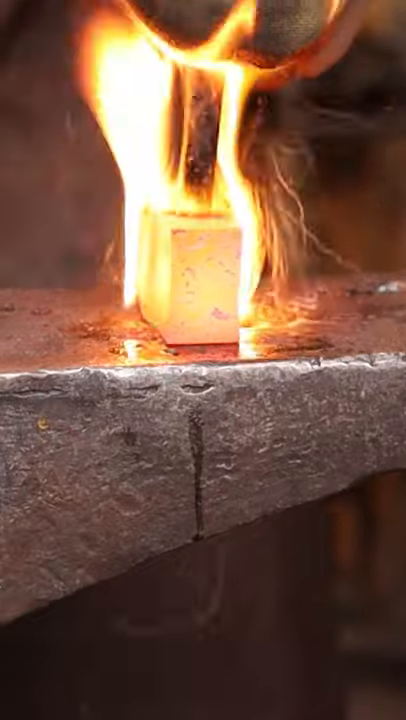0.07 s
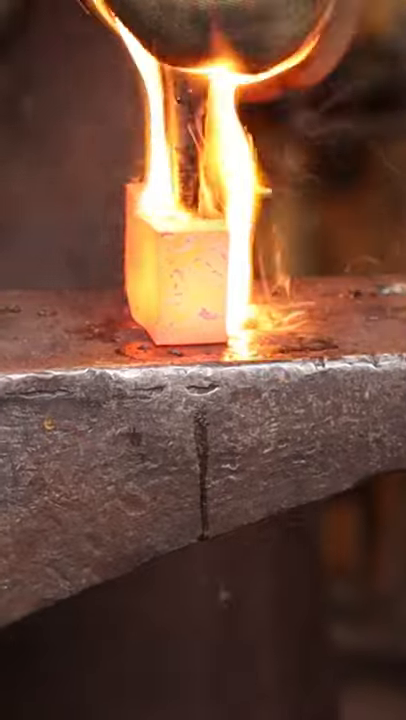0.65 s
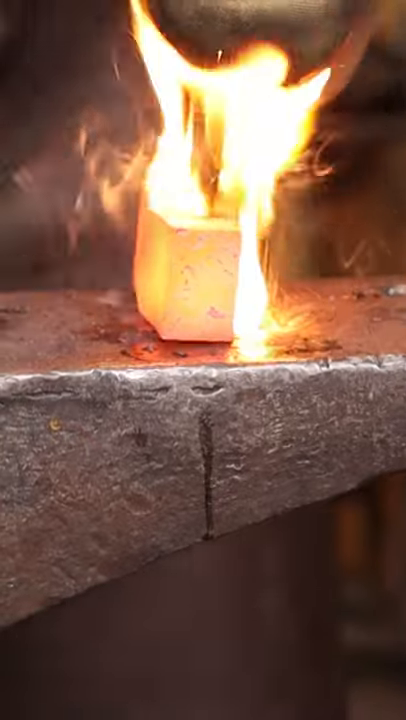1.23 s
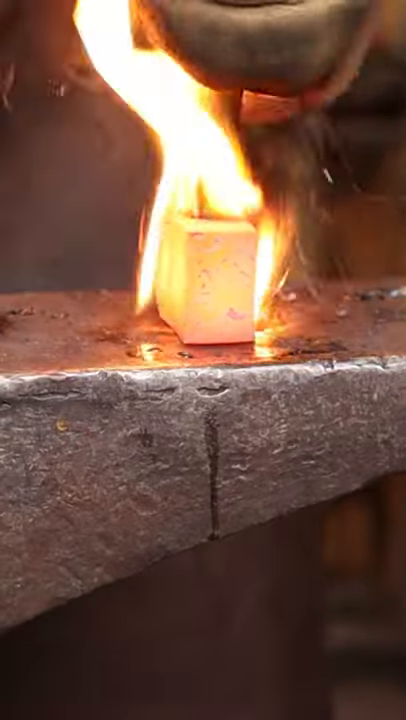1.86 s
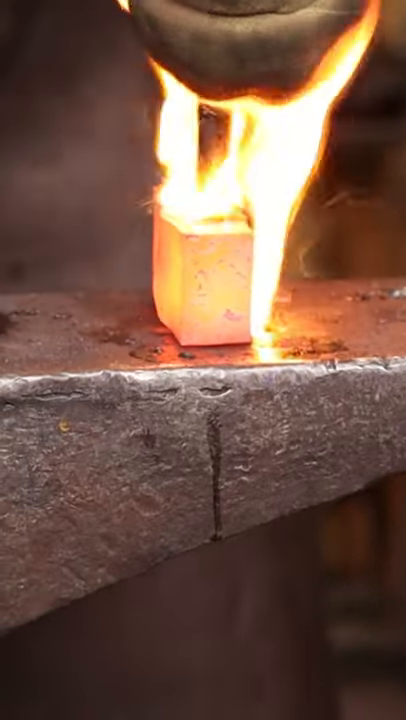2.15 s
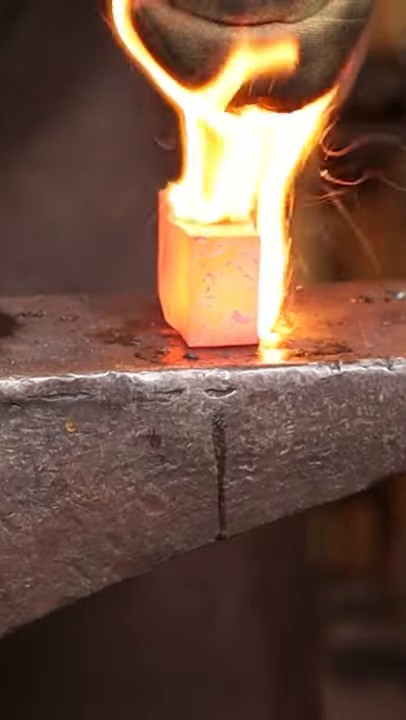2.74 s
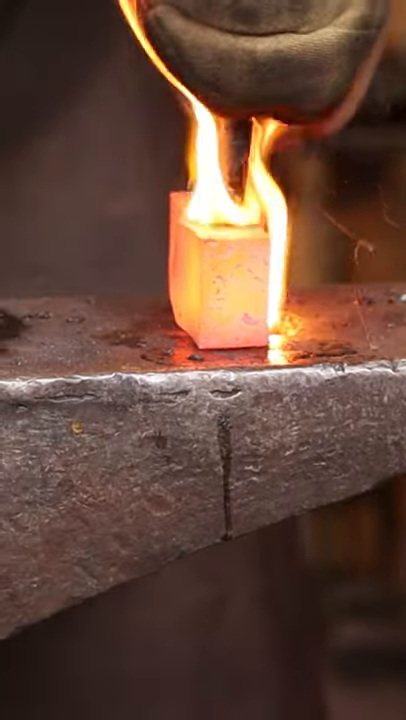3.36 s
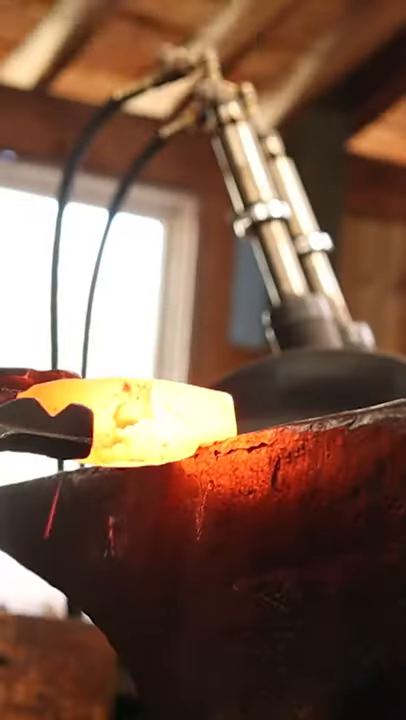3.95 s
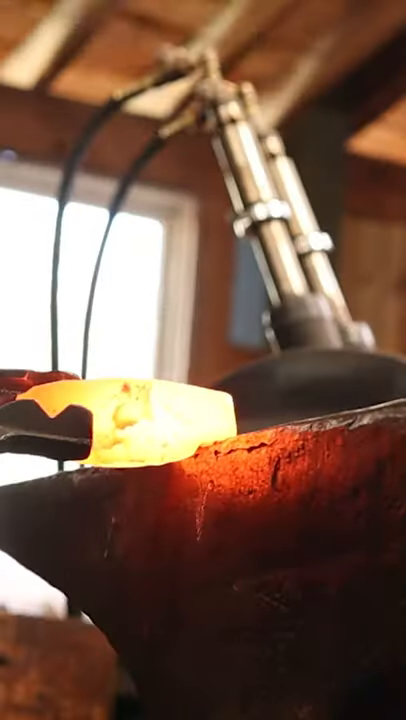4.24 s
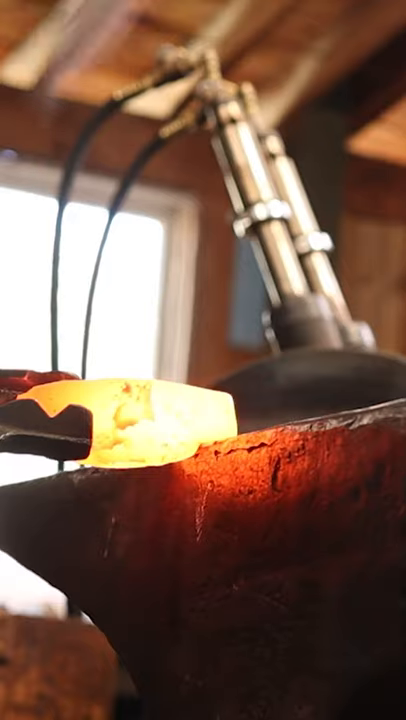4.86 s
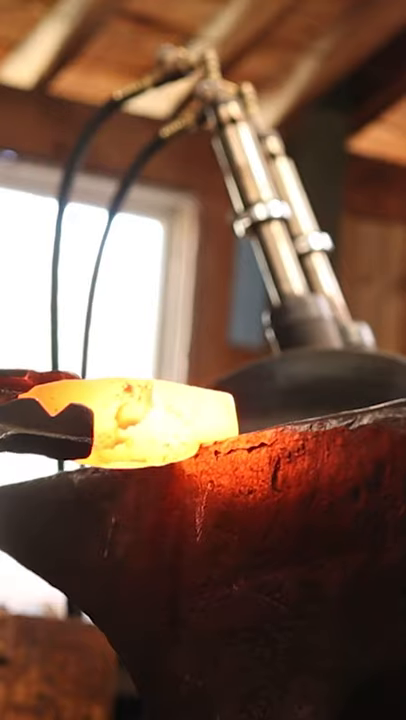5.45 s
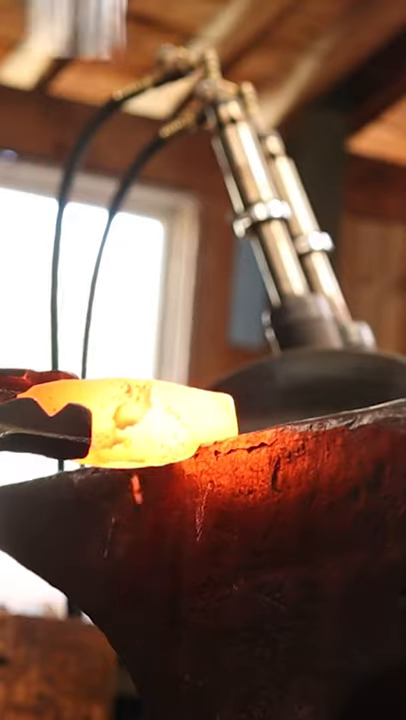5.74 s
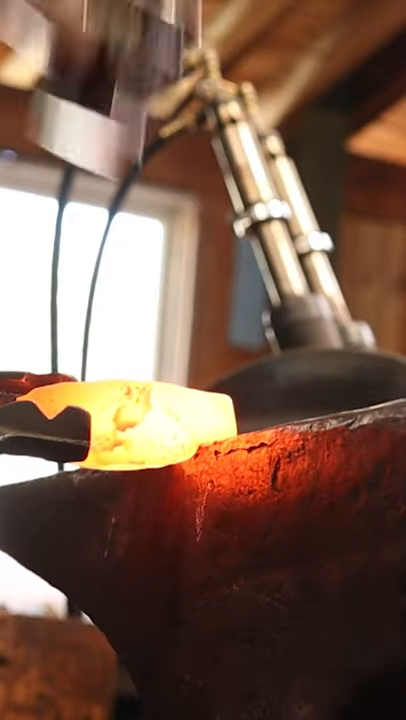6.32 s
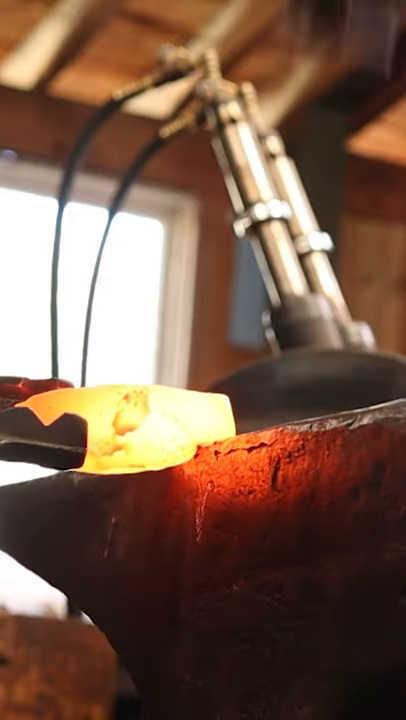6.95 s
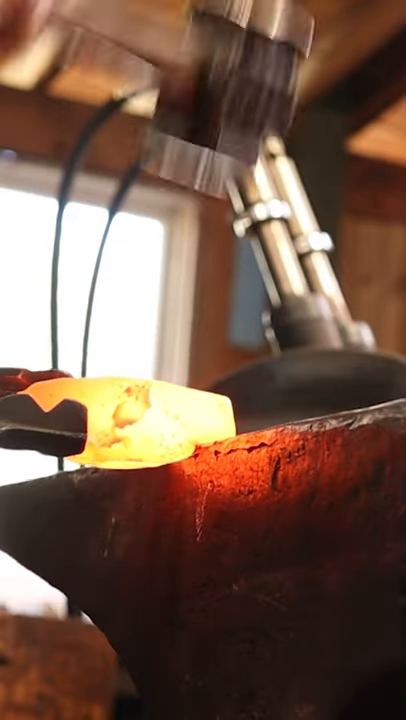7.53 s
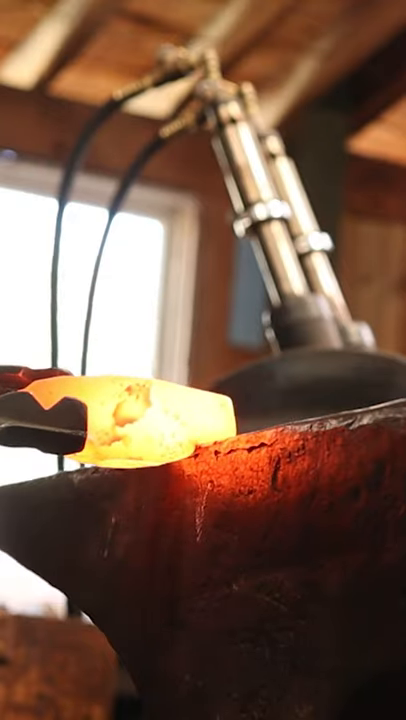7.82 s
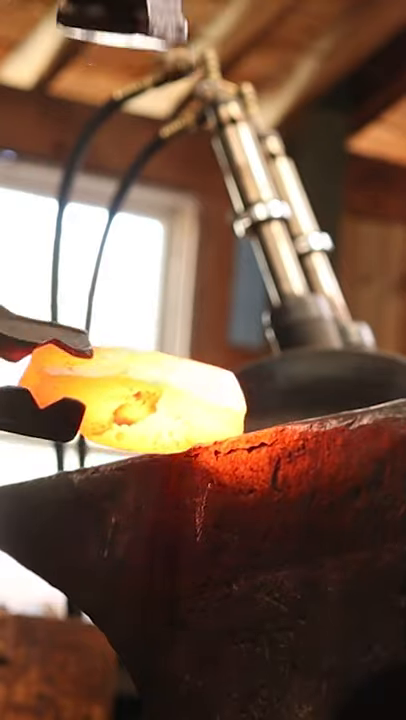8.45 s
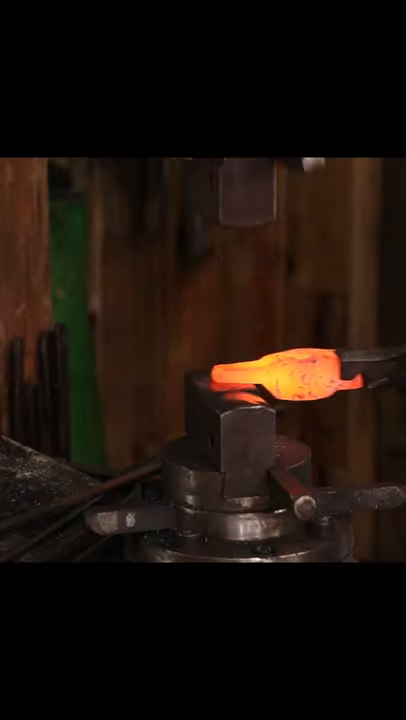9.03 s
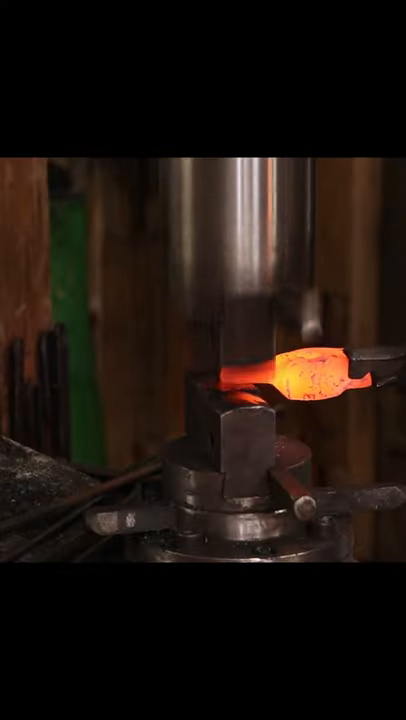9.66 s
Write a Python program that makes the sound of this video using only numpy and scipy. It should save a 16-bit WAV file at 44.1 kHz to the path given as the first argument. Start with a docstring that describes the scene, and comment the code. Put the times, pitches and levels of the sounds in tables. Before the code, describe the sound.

Hard hammer blows clank on a steel punch, then on hot steel on an anvil, before a power hammer pounds four quick strokes.

```python
"""Hammer blows on hot steel: three forge jobs in turn, close to a microphone that overloads on hard hits.
A hammer drives a punch into a block while the lubricant burns and spits, then draws out a billet on a
ringing anvil. Last, a power hammer pounds a bar and puffs air. Each blow is a contact crack plus decaying
modes, echoed by the workshop. Tongs tick and the billet scuffs between blows, over faint air and hum."""
import sys
import numpy as np
from scipy import signal
from scipy.fft import rfft, irfft
from scipy.io import wavfile

SR = 44100
rng = np.random.default_rng(int(sys.argv[2]) if len(sys.argv) > 2 else 0)


def unload_audio(sound):
    """Save the sound as a 16-bit wav file, at the path given as the first command line argument."""
    columns = np.transpose(np.atleast_2d(sound))
    # keep every value between -1 and 1, then stretch to whole-number steps
    steps = np.round(np.clip(columns, -1, 1) * 32767)
    wavfile.write(sys.argv[1], SR, steps.astype(np.int16))


N = 427329
TIME = np.arange(N) / SR
AGE = np.arange(SR) / SR  # s since an onset
RAM_START_S = 8.768

# hammer on billet, equal swings: start_s, clang_db, hammer_ping_db, anvil_note_db
BILLET_BLOWS = [(3.862, 2, -35, -71.5), (4.478, 0.5, -24, -62), (5.085, 0.5, -24.5, -90.5),
                (5.7032, -13, -53.5, -75.5), (6.325, -2, -32.5, -73.5), (6.944, -0.5, -30.5, -93),
                (7.5571, -1.5, -28.5, -80), (8.1848, -12.5, -35, -78.5)]
# wall echo spectrum for punch and tongs: freq_hz, gain_db
PUNCH_ROOM = [(50, -7), (200, 21), (500, 4.5), (1000, 7.5), (1250, 2.5), (1600, 0.5), (4000, 1),
              (6000, -1.5), (10000, -9.5), (16000, -15)]


def amp(db):
    """Decibels to gain."""
    return 10 ** (np.asarray(db) / 20)


def unit_rms(x):
    """Scale to rms 1."""
    return x / np.sqrt(np.mean(x ** 2) + 1e-20)


def unit_energy(x):
    """Scale to energy 1."""
    return x / (np.linalg.norm(x) + 1e-20)


def curve_at(points, hz):
    """Interpolate on a log-frequency axis."""
    freq_hz, value = np.transpose(points)
    return np.interp(np.log(hz + 1), np.log(freq_hz + 1), value)


def add(mix, start_s, sound):
    """Mix a sound in place."""
    part = mix[max(round(start_s * SR), 0):][:len(sound)]
    part += sound[:len(part)]


def tinted(x, colour):
    """Filter by a (freq_hz, gain_db) curve."""
    return irfft(rfft(x) * amp(curve_at(colour, np.fft.rfftfreq(len(x), 1 / SR))), len(x))


def hiss(colour):
    """Steady coloured noise."""
    return unit_rms(tinted(rng.standard_normal(N), colour))


def background(air_db=-71):
    """Quiet shop air and faint electric hum."""
    # air spectrum: freq_hz, gain_db
    shop_air = [(20, -30.5), (50, -6.5), (100, -4.5), (200, -10.5), (500, -15), (1200, -16.5), (2500, -21),
                (5000, -22.5), (8000, -28.5), (16000, -29)]
    # hum: pitch_hz, level_db
    hum_tones = [(104, -79.5), (176, -80.5), (268, -84.5)]
    hum = sum(amp(db) * np.sin(2 * np.pi * (hz * TIME + rng.random())) for hz, db in hum_tones)
    return amp(air_db) * hiss(shop_air) + hum


def taps():
    """Sparse reflections of random sign and size."""
    return rng.standard_normal(SR) * (rng.random(SR) < .25)


def workshop(colour, count, bench_db, bench_s, room_db, wall_s, early_share):
    """One response per blow: bench and tools, then walls. Only the smith moves, so all are alike."""
    # wall decay: freq_hz, t60_s
    room_t60 = [(60, 1), (200, 0.37), (900, 0.37), (1250, 0.37), (1700, 0.35), (3000, 0.32), (6000, 0.23),
                (10000, 0.17), (16000, 0.73)]
    still_bench, still_walls, responses = taps(), taps(), []
    swell = np.interp(AGE, [wall_s * 2 / 3, wall_s * 7 / 8], [early_share, 1])
    for _ in range(count):
        bench = unit_energy((still_bench + taps() / 2) * np.exp(-AGE / bench_s) * (AGE > .003))
        hz, t, bands = signal.stft(still_walls + taps(), SR, nperseg=256)
        decay = amp(-60 * np.maximum(t - wall_s, 0) / curve_at(room_t60, hz)[:, None])
        tail = signal.istft(bands * decay, SR, nperseg=256)[1][:SR]
        walls = tinted(unit_energy(tail * swell), colour)
        responses.append(amp(bench_db) * bench + amp(room_db) * walls)
    return responses


def crackle(colour, rate_hz, size_db, burst_gain, decay_s=0.00067):
    """Tiny uneven bursts over a soft fizz."""
    sizes = amp(size_db * np.minimum(rng.exponential(1, N), 3))
    onsets = rng.random(N) < rate_hz / SR
    envelope = signal.lfilter([1], [1, -np.exp(-1 / (decay_s * SR))], sizes * onsets)
    bursts = unit_rms(tinted(envelope * rng.standard_normal(N), colour))
    return unit_rms(burst_gain * bursts + .5 * hiss(colour))


def flames(burn_db=-64.5, hold_s=2.1, fade_db_per_s=7.5, flare_rise_s=0.0034, flare_decay_s=0.056):
    """Lubricant fizzes and spits around the punch, then runs out."""
    # fresh lubricant flares on hot steel: start_s, level_db
    flares = [(1.52, -49), (1.635, -56), (2.1, -64)]
    # burn spectrum: freq_hz, gain_db
    sizzle = [(200, -17.5), (1200, -4), (2800, -9.5), (4400, -2), (6500, -9), (9000, -9), (16000, -12.5)]
    burning = amp(burn_db - fade_db_per_s * np.maximum(TIME - hold_s, 0))
    for start_s, db in flares:
        add(burning, start_s, amp(db) * (1 - np.exp(-AGE / flare_rise_s)) * np.exp(-AGE / flare_decay_s))
    first_job = TIME < BILLET_BLOWS[0][0]
    return burning * first_job * crackle(sizzle, rate_hz=450, size_db=3.5, burst_gain=.55)


def click(colour, size=4096):
    """Minimum-phase contact pulse with the given spectrum."""
    log_gain = np.log(amp(curve_at(colour, abs(np.fft.fftfreq(size, 1 / SR)))))
    pulse = np.fft.ifft(np.exp(np.conj(signal.hilbert(log_gain)))).real[:size // 2]
    return unit_energy(np.pad(pulse, (0, SR - len(pulse))))


def ring(modes, spread=0.0087):
    """Decaying modes of alternating sign, slightly detuned at random; strength varies per blow."""
    strengths = amp(rng.uniform(-2, 2, len(modes)))
    out = np.zeros(SR)
    for k, (hz, db, t60_s) in enumerate(modes):
        pitch_hz = hz * (1 + spread * rng.standard_normal())
        mode = unit_energy(amp(-60 * AGE / t60_s) * np.sin(2 * np.pi * pitch_hz * AGE))
        out += (-1) ** k * strengths[k] * amp(db) * mode
    return out


def ping(hz, db, t60_s, waver, width_hz, rise_s):
    """Long pure ring beating with its own echoes."""
    t = np.arange(3 * SR) / SR
    band = np.exp(-(np.fft.fftfreq(len(t), 1 / SR) / width_hz) ** 2)
    echoes = np.fft.ifft(band * np.exp(2j * np.pi * rng.random(len(t))))
    tone = (1 + waver * echoes / np.std(echoes)) * np.exp(2j * np.pi * hz * t)
    envelope = amp(db - 60 * t / t60_s) * (1 - np.exp(-t / rise_s))
    return envelope * tone.imag / np.sqrt(1 + waver ** 2)


def scatter(direct_db, decay_s):
    """First contact, then brief chatter and close reflections."""
    chatter = unit_energy(taps() * np.exp(-AGE / decay_s))
    chatter[0] = amp(direct_db)
    return unit_energy(chatter)


def strike(colour, ringing, near, room):
    """A crack and the modes it wakes, direct and through the room."""
    crack = click(colour)
    direct = signal.fftconvolve(crack, near)[:SR] + ringing
    echoes = signal.fftconvolve(crack + ringing, room)[:SR]
    return (direct + echoes)[:int(.85 * SR)]


def tongs(faint_rate_hz=2.5, faint_db=-45, faint_spread_db=2.5):
    """Steel-on-steel ticks of tongs and punch, with faint ones at random."""
    # clear ticks: start_s, level_db
    clear_ticks = [(1.6777, -25.5), (1.7425, -29.5), (2.0567, -27.5), (2.1146, -25), (3.0153, -25),
                   (3.102, -33.5), (4.4269, -39.5), (4.8892, -31.5), (5.047, -36), (6.9096, -36),
                   (8.0877, -34), (8.666, -38)]
    # contact spectrum: freq_hz, gain_db
    tick_colour = [(100, -34), (1000, -5.5), (2500, -10), (4500, 2.5), (8000, -7), (16000, -14)]
    # tong modes: pitch_hz, gain_db, t60_s
    tong_modes = [(3330, -15, .04), (4150, -12, .05), (5000, -14, .04), (6440, -6.5, .05)]
    draws = rng.random((round(faint_rate_hz * RAM_START_S), 2))
    faint_ticks = [(when * RAM_START_S, faint_db + faint_spread_db * (2 * size - 1))
                   for when, size in draws]
    ticks = clear_ticks + faint_ticks
    rooms = workshop(PUNCH_ROOM, len(ticks), bench_db=-4.5, bench_s=0.014,
                     room_db=-11, wall_s=0.047, early_share=.8)
    out = np.zeros(N)
    for (start_s, db), room in zip(ticks, rooms):
        ringing = ring(tong_modes, spread=0.061)
        near = scatter(direct_db=-5.5, decay_s=0.0027)
        add(out, start_s, amp(db) * strike(tick_colour, ringing, near, room))
    return out


def scuffing(half_width_s=0.1):
    """The billet slides on its scale across the anvil face."""
    # slides: centre_s, level_db
    slides = [(5.414, -65.5), (7.254, -64.5), (8.0, -69.5)]
    # scuff spectrum: freq_hz, gain_db
    scuff_colour = [(300, -5), (1300, 3.5), (2500, -4), (4300, -3), (6000, -4), (9000, -17.5), (16000, -14)]
    sliding = sum(amp(db) * np.exp(-((TIME - centre_s) / half_width_s) ** 2) for centre_s, db in slides)
    return sliding * crackle(scuff_colour, rate_hz=560, size_db=4, burst_gain=.5)


def squeak(hz, width_hz):
    """Noise in one narrow resonance."""
    band = np.exp(-((np.fft.rfftfreq(N, 1 / SR) - hz) / width_hz) ** 2)
    return unit_rms(irfft(rfft(rng.standard_normal(N)) * band, N))


def power_hammer(air_db=-48, air_lead_s=0.035, air_s=0.048, motor_db=-43, knock_db=-15, knock_lag_s=.14):
    """The drive rumbles, air rushes as the ram falls, the frame thumps, the linkage knocks going up."""
    # strokes: start_s, force_db, thump_db
    blows = [(8.770, -2.5, -19), (8.9966, 4, 7.5), (9.2651, 1.5, 10), (9.5338, 3.5, 10)]
    # spectra of contact, drive and linkage, air: freq_hz, gain_db
    crack_colour = [(40, -28.5), (100, -13), (300, -1), (500, 0.5), (900, -5), (1500, -6.5), (2200, -6),
                    (3100, -3.5), (4200, -9), (6200, -17), (8000, -24.5), (16000, -41.5)]
    machine_colour = [(30, -37), (70, -36), (130, -6), (290, -1.5), (420, -5), (600, -14.5), (1200, -15.5),
                      (2500, -21), (5000, -37), (16000, -54)]
    air_colour = [(500, -32), (2500, -11), (4700, -11), (6800, -16), (9000, -20), (16000, -27)]
    # die and frame modes: pitch_hz, gain_db, t60_s
    die_modes = [(3130, -13, 0.041), (3230, -25, 0.049), (6060, -21, 0.031)]
    frame_modes = [(227.6, 0, 0.068), (148, -10.5, 0.031), (275.4, -12.5, 0.51), (354, -18, 0.75),
                   (440, -17, 0.38)]
    # air valve squeaks: pitch_hz, width_hz, level_db
    valve = [(2450, 380, -50), (7900, 500, -57)]
    room_colour = [(100, 15.5), (4000, 3), (16000, -24)]  # freq_hz, gain_db
    rooms = workshop(room_colour, len(blows), bench_db=-7, bench_s=0.055,
                     room_db=-7, wall_s=0.031, early_share=0.5)
    thump_rise = 1 - np.exp(-AGE / 0.013)
    out = np.zeros(N)
    for (start_s, force_db, thump_db), room in zip(blows, rooms):
        near = scatter(direct_db=-16.5, decay_s=0.026)
        add(out, start_s, amp(force_db) * strike(crack_colour, ring(die_modes, spread=0.026), near, room))
        add(out, start_s, amp(thump_db) * ring(frame_modes, spread=0.014) * thump_rise)
        add(out, start_s + knock_lag_s, amp(knock_db) * strike(machine_colour, 0, near, room))
    puffs = sum(np.exp(-((TIME - start_s + air_lead_s) / air_s) ** 2) for start_s, _, _ in blows[1:])
    air = amp(air_db) * hiss(air_colour)
    air += sum(amp(db) * squeak(hz, width_hz) for hz, width_hz, db in valve)
    running = amp(motor_db) * hiss(machine_colour) + puffs * air
    return out + running * (TIME > RAM_START_S)


def hammer_on_billet(force_db=16.5, overtone_db=-8):
    """Soft hot steel thuds; hammer and anvil ring, and a square blow wakes the anvil's long note."""
    # spectra of contact and wall echo: freq_hz, gain_db
    crack_colour = [(30, -21), (100, -10.5), (200, -13.5), (300, -7.5), (460, -6.5), (620, -11.5),
                    (1000, -3), (1300, 0), (2100, 1.5), (3000, 1.5), (4000, -0.5), (7000, -8), (10000, -13),
                    (16000, -27)]
    room_colour = [(50, 2.5), (200, 9.5), (500, 5.5), (1000, 3), (1250, 3), (1800, -3.5), (4000, -3),
                   (6000, -5.5), (10000, -14.5), (16000, -15.5)]
    # modes of the clang and the hot billet: pitch_hz, gain_db, t60_s
    clang_modes = [(2523, -13.5, 0.099), (2556, -12.5, .06), (2730, -13.5, 0.025), (3330, -14.5, .025),
                   (3925, -17.5, .05), (1159, -24, 0.084)]
    thud_modes = [(500, -25.5, 0.05), (1380, -0.5, 0.0021), (1710, 1.5, 0.0016)]
    # long rings of hammer, anvil note, anvil overtone: pitch_hz, t60_s
    pings = [(12520, .54), (3226, 3.6), (5835, 2.2)]
    # ring of the anvil's waist: pitch_hz, gain_db, t60_s
    waist = (2620, -23.5, .36)
    (hammer_hz, hammer_t60_s), *anvil = pings
    waist_hz, waist_db, waist_t60_s = waist
    rooms = workshop(room_colour, len(BILLET_BLOWS), bench_db=-11, bench_s=0.024,
                     room_db=-9.5, wall_s=0.085, early_share=0.74)
    out = np.zeros(N)
    for (start_s, clang_db, hammer_db, anvil_db), room in zip(BILLET_BLOWS, rooms):
        clang = amp(clang_db) * ring(clang_modes)
        near = scatter(direct_db=5.5, decay_s=0.0025)
        add(out, start_s, amp(force_db) * strike(crack_colour, clang, near, room))
        add(out, start_s, amp(force_db) * ring(thud_modes))
        add(out, start_s, ping(waist_hz, waist_db + clang_db, waist_t60_s,
                               waver=2.5, width_hz=65, rise_s=.02))
        add(out, start_s, ping(hammer_hz, hammer_db, hammer_t60_s, waver=2.3, width_hz=80, rise_s=0.17))
        for k, (hz, t60_s) in enumerate(anvil):
            note_db = anvil_db + k * overtone_db
            add(out, start_s, ping(hz, note_db, t60_s, waver=.15, width_hz=3.4, rise_s=.003))
    return out


def hammer_on_punch(clink_db=-1.5, clink_db_per_s=1.04, body_db=2.5, body_db_per_s=-2):
    """As the hole deepens, the punch clinks more and the block's dull body note fades."""
    # blows: start_s, force_db, lower_ping_db, upper_ping_db
    blows = [(0.0018, 15.5, -57.5, -62), (0.4444, 15.5, -40, -44.5), (0.8903, 15, -41, -39),
             (1.333, 15, -39, -42.5), (1.787, 14, -49, -52), (2.2392, 13.5, -52.5, -32.5),
             (2.6883, 13.5, -40.5, -55), (3.1316, 13.5, -41.5, -55.5), (3.587, 12, -40.5, -58)]
    # contact spectrum: freq_hz, gain_db
    crack_colour = [(30, -20), (100, -14), (200, -17.5), (450, -5), (900, -5), (1300, 0), (2000, -4.5),
                    (3300, 2.5), (4600, 1.5), (7000, -6), (10000, -9), (16000, -16.5)]
    # punch and block modes: pitch_hz, gain_db, t60_s
    punch_modes = [(2680, -16, 0.044), (3300, -15.5, 0.096), (3505, -8.5, 0.0097), (3610, -14, 0.015),
                   (4530, -19, .025), (5250, -15, .07), (5890, -13.5, 0.025), (6340, -18, 0.036),
                   (8270, -23.5, 0.027), (11870, -27, 0.061), (13800, -28.5, .06)]
    block_modes = [(800, -18, 0.032), (1204, -9.5, 0.016), (1303, -14.5, 0.019), (1380, -17.5, 0.074)]
    # long rings: pitch_hz, t60_s
    pings = [(9733, .24), (11022, .4)]
    rooms = workshop(PUNCH_ROOM, len(blows), bench_db=-13, bench_s=0.018,
                     room_db=-12, wall_s=0.07, early_share=0.77)
    out = np.zeros(N)
    for (start_s, force_db, *pings_db), room in zip(blows, rooms):
        clink = amp(clink_db + clink_db_per_s * start_s) * ring(punch_modes)
        body = amp(body_db + body_db_per_s * start_s) * ring(block_modes)
        near = scatter(direct_db=-11.5, decay_s=0.00081)
        add(out, start_s, amp(force_db) * strike(crack_colour, clink + body, near, room))
        for (hz, t60_s), ping_db in zip(pings, pings_db):
            add(out, start_s, ping(hz, ping_db, t60_s, waver=1.1, width_hz=45, rise_s=.002))
    return out


def scene():
    """Three jobs over the small sounds of the shop, mono."""
    hammers = hammer_on_punch() + hammer_on_billet() + power_hammer()
    return (hammers + tongs() + scuffing() + flames() + background())[None]


def record(dry, ceiling=.44, low_cut_hz=62, high_cut_hz=16100):
    """Microphone overload on hard blows, then bass cut and band limit."""
    saturated = dry / (1 + (dry / ceiling) ** 6) ** (1 / 6)
    thinned = signal.sosfilt(signal.butter(2, low_cut_hz, "highpass", fs=SR, output="sos"), saturated)
    lowpass = signal.firwin(201, high_cut_hz, window=("kaiser", 9), fs=SR)
    return signal.oaconvolve(thinned, lowpass[None], "same")


dry = scene()
out = record(dry)
unload_audio(out)
```